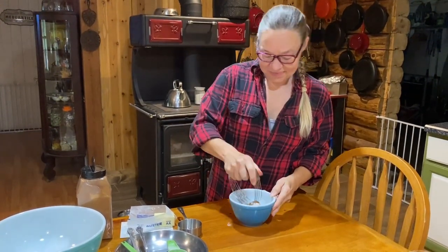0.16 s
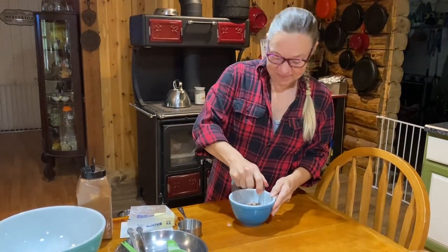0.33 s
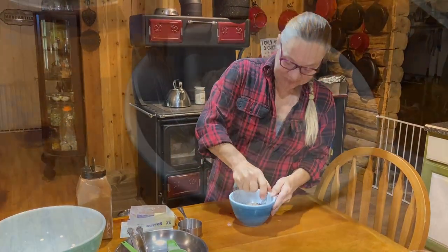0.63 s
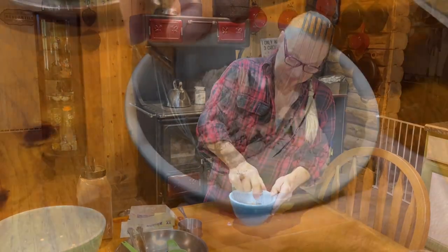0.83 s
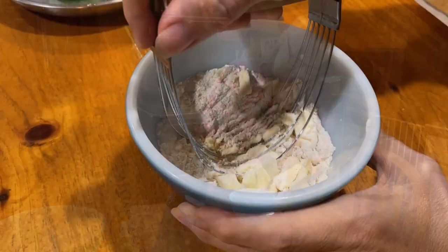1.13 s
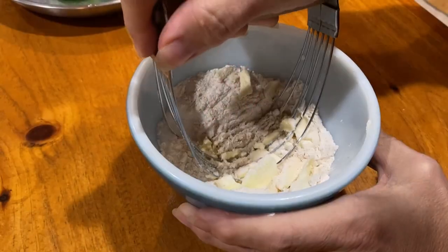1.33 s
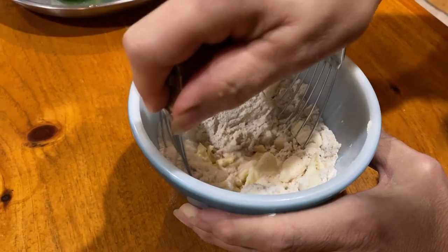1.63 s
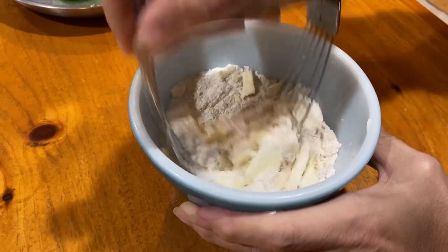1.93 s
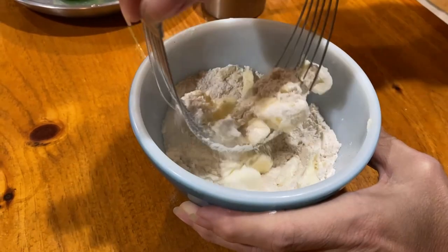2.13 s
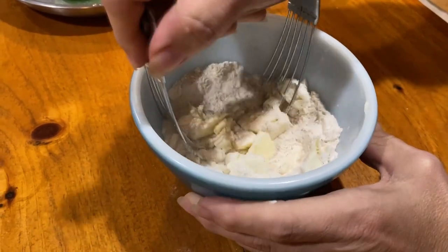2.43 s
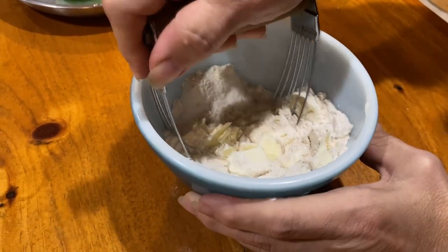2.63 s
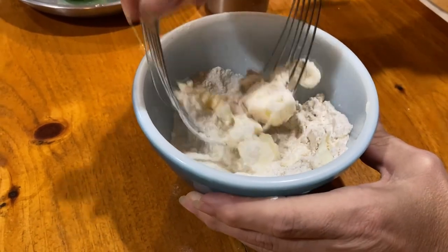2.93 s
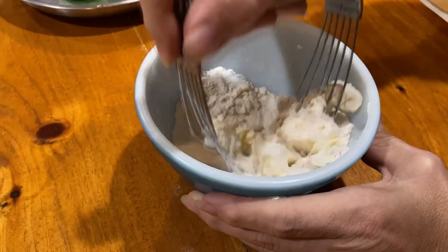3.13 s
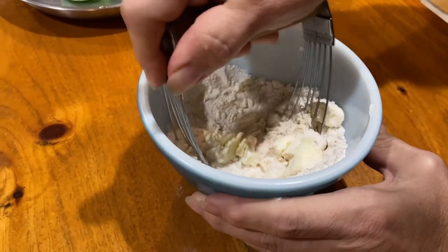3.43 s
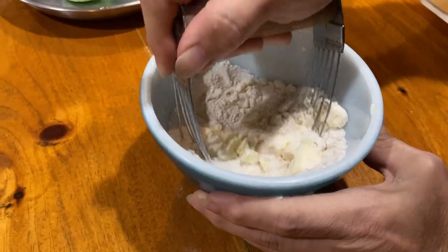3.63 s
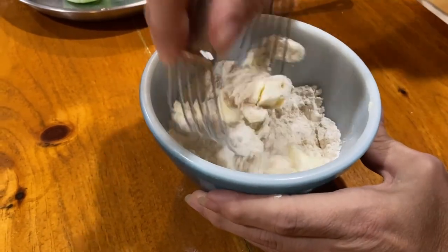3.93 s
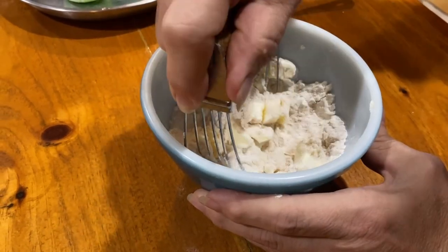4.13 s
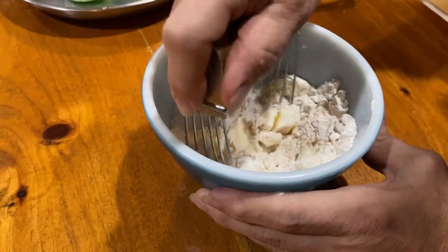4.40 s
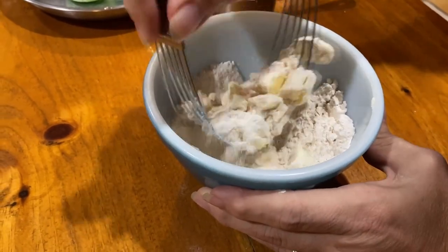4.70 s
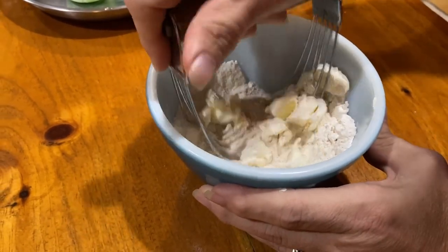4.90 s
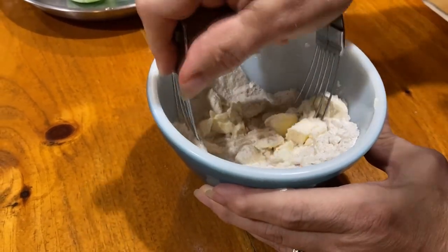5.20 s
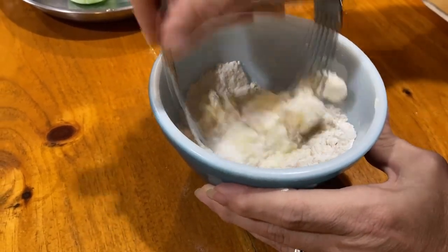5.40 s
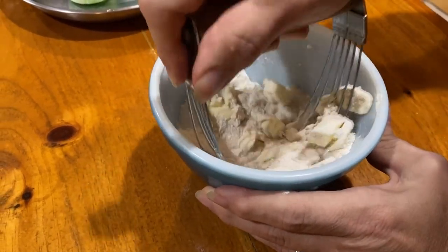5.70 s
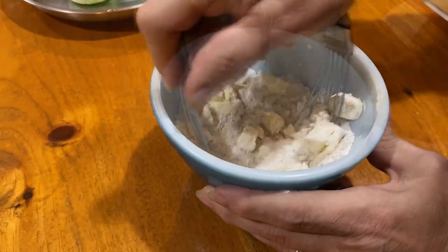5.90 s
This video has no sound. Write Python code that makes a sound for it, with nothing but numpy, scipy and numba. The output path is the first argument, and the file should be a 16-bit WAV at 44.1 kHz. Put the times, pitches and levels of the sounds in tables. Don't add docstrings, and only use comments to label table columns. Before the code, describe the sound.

Quiet kitchen air and a faint steady appliance hum fade in, heard across a wooden room. Small bowl bumps and a faint clink come at 0.1, 0.25 and 0.5-0.7 s, then a hard wooden set-down with a rattle at 0.9 s. From about 1 s the perspective is close: a thin wire pings, then a wire cutter pushes through butter and flour with dry rasp and gritty glass hiss near 1.65 s. Stronger chops at 2.15-2.6 s bring low table thumps, snaps and bowl clinks. A lighter lull follows, then a sharp snap at 3.5 s and a woody knock at 3.65 s. The loudest, brightest cracks and clinks land at 4.2-4.3 s with heavy thuds. Smaller strokes follow at 4.8-5.25 s, ending with a high wire ping, a scraping clink at 5.6 s and a last snap and scrape at 5.88 s. Short woody reflections surround everything.

```python
import sys
import numpy as np
from scipy import signal
from scipy.fft import rfft, irfft, next_fast_len
from scipy.io import wavfile
from scipy.ndimage import uniform_filter1d
from numba import njit

SR = 44100
rng = np.random.default_rng(int(sys.argv[2]) if len(sys.argv) > 2 else 0)


def how_loud(loudness_db):
    steps = np.asarray(loudness_db, float) / 20
    return 10 ** steps


def wrap_up_sound(samples):
    columns = np.atleast_2d(samples).T
    tamed = np.clip(columns, -1, 1)
    steps = np.round(tamed * 32767).astype(np.int16)
    wavfile.write(sys.argv[1], SR, steps)


N = 267025
SCENE_CHANGE_S = 1.02


def unit(x):
    return x / np.sqrt(np.mean(x ** 2))


def band(x, lo_hz, hi_hz, order=2):
    return signal.sosfilt(signal.butter(order, [lo_hz, hi_hz], "bandpass", fs=SR, output="sos"), x)


def resonate(x, hz, width_hz):
    return signal.lfilter(*signal.iirpeak(hz, hz / width_hz, SR), x)


def colour(x, points):
    hz, db = np.transpose(points)
    size = next_fast_len(x.shape[-1])
    f = np.maximum(np.fft.rfftfreq(size, 1 / SR), 1)
    gain = how_loud(np.interp(np.log(f), np.log(hz), db))
    return irfft(rfft(x, size) * gain, size)[..., :x.shape[-1]]


def curve(s, values):
    return np.interp(np.arange(N) / SR, s, values)


def walk(rate_hz):
    hold = int(SR / rate_hz)
    steps = np.repeat(rng.standard_normal(N // hold + 1), hold)
    return 1.42 * uniform_filter1d(uniform_filter1d(steps, hold), hold)[:N]


def ring(hz, db, t60_s, phase, length_s):
    t = np.arange(int(length_s * SR)) / SR
    tones = np.sin(2 * np.pi * hz[:, None] * t + phase[:, None])
    fades = 1000. ** (-t / t60_s[:, None])
    return (how_loud(db)[:, None] * tones * fades).sum(0)


def add(out, s, x):
    i = int(s * SR)
    out[i:i + len(x)] += x[:N - i]


def bursts(count, peak_ms):
    t = np.arange(int(.03 * SR)) / SR * 1000 / peak_ms
    return rng.standard_normal((count, len(t))) * t * np.exp(1 - t)


def grains(rate_hz, spread_db):
    sizes = rng.standard_normal(N) * how_loud(spread_db * rng.exponential(size=N))
    return (rng.random(N) < rate_hz / SR) * sizes


def strokes(s, rise_s, fall_s, db):
    rounding = 1.31
    late = np.arange(0, N, 64) / SR - s[:, None]
    share = np.abs(np.where(late < 0, late / rise_s[:, None], late / fall_s[:, None]))
    return how_loud(db[:, None] - 20 * share ** rounding)


def together(gains, rest_db):
    return curve(np.arange(0, N, 64) / SR, np.sqrt((gains ** 2).sum(0) + how_loud(2 * rest_db)))


@njit
def hollow(x, hz, sharp):
    y, b, l = np.empty(len(x)), 0., 0.
    for i in range(len(x)):
        g = np.tan(np.pi * hz[i] / SR)
        v = (b + g * (x[i] - l)) / (1 + g * (g + 1 / sharp))
        b, l, y[i] = 2 * v - b, l + 2 * g * v, v * (1000 / hz[i]) ** .25
    return y


# frequency in Hz, level in dB per Hz.
AIR_COLOUR = [(53, -40.5), (90, -10.5), (282, -24), (494, -9.5), (654, -14.5), (713, -1.5), (1050, -25),
              (5300, -24), (11500, -35), (15600, -56)]
# pitch in Hz, rms level in dB.
HUM_TONES = [(360.7, -77), (721, -75)]
# time in seconds, level in dB.
BACKGROUND_FADE = [(0, -28), (.45, -15), (.75, -2.5), (1.1, -2)]


def kitchen():
    shared = colour(rng.standard_normal(N), AIR_COLOUR)
    own = colour(rng.standard_normal((2, N)), AIR_COLOUR)
    air = unit(shared + 4.2 * band(own, 440, 16000)) * how_loud(-63 + 0.88 * walk(2.5))
    t = np.arange(N) / SR
    hum = np.zeros(N)
    for hz, db in HUM_TONES:
        hum += np.sqrt(2) * how_loud(db + 4.0 * walk(16.0)) * np.sin(2 * np.pi * hz * t)
    return (air + hum) * how_loud(curve(*np.transpose(BACKGROUND_FADE)))


# time in seconds, level in dB.
LEANING = [(0.0, -75), (0.59, -74), (1.04, -51), (1.3, -57.5), (2.14, -65), (2.46, -39.5), (2.93, -65.5),
           (3.49, -48), (4.0, -65.5), (4.36, -42), (4.53, -57.5), (5.09, -50), (5.41, -63.5), (6.05, -52)]


def rumble():
    return how_loud(curve(*np.transpose(LEANING))) * unit(resonate(rng.standard_normal(N), 65, 27.97))


# frequency in Hz, level in dB per Hz.
SLAM_COLOUR = [(240, -19), (400, 11.5), (455, -7), (684, -2.5), (819, -14.5), (2830, -24.5), (8500, -81),
               (11000, -84.5)]


def slam():
    out, t = np.zeros(N), np.arange(int(.4 * SR)) / SR
    body = unit(colour(rng.standard_normal(len(t)), SLAM_COLOUR))
    fade = 1000. ** (-t / 0.43) + 2.6 * 1000. ** (-t / 0.14)
    add(out, .893, how_loud(-28) * body * fade)
    return out


# mode in Hz, level in dB, t60 in seconds.
TABLE_MODES = [(72.1, -7.5, 0.42), (99.2, -16, 0.28), (124.3, 1.5, 0.23), (138.1, -8.5, 0.35),
               (152.15, -3.5, 0.26), (171.6, -6.5, 0.24), (203, -7, 0.24), (229.8, 3.5, 0.15),
               (269.6, 2, 0.18), (328.2, -2, 0.13), (389.6, -5, 0.15)]
# start in seconds, peak in dB, strongest table pitch in
# Hz.
BUMPS = [
    (0.122, -50, 171),
    (0.242, -45.5, 197),
    (0.508, -46.5, 152),
    (0.574, -43, 196),
    (0.71, -43, 184),
    (0.89, -6.5, 178),
    (1.138, -39, 152),
    (1.284, -51, 163),
]
# start in seconds, peak in dB, strongest table pitch in Hz.
PUSHES = [(1.644, -27.5, 110), (1.699, -33.5, 162), (2.172, -25.5, 109), (2.316, -21.5, 121),
          (2.38, -34, 159), (2.43, -30, 144), (2.509, -12, 142), (2.544, -16.5, 127), (2.718, -33, 144),
          (3.497, -17, 137.4), (3.533, -19, 134), (3.589, -30, 144), (3.96, -42.5, 102.6),
          (4.021, -35.5, 129), (4.093, -36.5, 153), (4.178, -23.5, 149), (4.194, -12.5, 122),
          (4.292, -6.5, 125.6), (4.359, -41, 144.6), (4.437, -32.5, 138), (4.483, -37.5, 146.6),
          (4.519, -37, 143), (5.016, -18, 122), (5.88, -24.5, 115), (5.931, -38.5, 132)]
# start in seconds, peak in dB, strongest pitch in Hz.
ROCKS = [(1.564, -35.5, 128), (1.822, -33.5, 198), (1.855, -31, 138.5), (2.267, -19.5, 124),
         (2.601, -18, 136), (2.624, -17.5, 128), (2.839, -42.5, 150), (3.136, -53, 200),
         (3.342, -44.5, 151), (3.647, -8, 141), (3.684, -19, 143), (4.249, -18.5, 126), (4.326, -8.5, 139),
         (4.757, -24, 123), (4.8, -28.5, 131), (5.112, -30, 122), (5.164, -33, 132), (5.252, -31.5, 130),
         (5.328, -44.5, 133), (5.6, -37.5, 167), (5.766, -42, 158), (5.848, -34, 124)]


def thumps():
    out, (hz, db, t60_s) = np.zeros(N), np.transpose(TABLE_MODES)
    t = np.arange(int(.35 * SR)) / SR
    softness = 1 - np.exp(-t / 0.0072)
    above_55_hz = signal.butter(2, 55, "highpass", fs=SR, output="sos")
    for rows, upper_db in ((BUMPS, -2.5), (PUSHES, -19.5), (ROCKS, -10.5)):
        for s, peak_db, main_hz in rows:
            chance = rng.standard_normal((3, len(hz)))
            near_db = np.where(hz > 210, upper_db, -14 * np.abs(np.log2(hz / main_hz)))
            mode_db = db + near_db + 2.17 * chance[1]
            wood = ring(hz * (1 + 0.0375 * chance[0]), mode_db, 0.8 * t60_s, 0.53 * chance[2], .35)
            wood = signal.sosfilt(above_55_hz, wood * softness)
            add(out, s, how_loud(peak_db - 1.0) * wood / np.abs(wood).max())
    return out


# peak time in seconds, rise and fall
# in seconds per 20 dB, peak in dB, pitch of the hollow in Hz.
FAR_CHOPS = [
    (0.126, -0.14, 0.57, -64.5, 2150),
    (.515, .02, .2, -62, 1410),
    (0.897, 0.022, 0.2146, -31.5, 720),
]
CHOPS = [(1.05, .07, 0.18, -43, 1960), (1.5, 0.48, .3, -51.5, 1037), (1.68, .22, .09, -33, 1400),
         (1.8, .1, 0.27, -56.5, 1112), (2.17, .02, 0.2, -45, 2050), (2.27, 0.084, 0.077, -36, 1220),
         (2.39, .15, 0.36, -42.5, 986), (2.508, 0.086, 0.17, -27, 1056), (3.15, 0.089, 0.067, -42.5, 2010),
         (3.36, .15, .15, -44, 1500), (3.49, .2, 0.28, -47, 800), (3.66, .4, 0.072, -47, 1026),
         (3.99, .05, .5, -45.5, 850), (4.2, 0.066, .2, -39.5, 1005), (4.29, 0.18, 0.12, -33.5, 1260),
         (4.51, .3, 0.06, -51.5, 1390), (4.79, 0.046, 0.16, -42, 930), (4.91, 0.17, 0.31, -41.5, 2140),
         (5.02, 0.09, 0.12, -38.5, 1225), (5.16, 0.056, .04, -37, 1070), (5.26, .015, 0.13, -43, 2170),
         (5.62, .11, .15, -45, 1500), (5.871, 0.35, 0.15, -45, 1062)]


def crumb_rasp():
    *chop, hollow_hz = np.transpose(FAR_CHOPS + CHOPS)
    chops = strokes(*chop)
    crumbs = band(grains(5000, 1.74), 230, 2200)
    power = chops ** 2
    centre_hz = (hollow_hz @ power + 1e-9) / (power.sum(0) + 1e-12)
    centre_hz = curve(np.linspace(0, N / SR, chops.shape[1]), centre_hz)
    rasp = unit(hollow(hollow(crumbs, centre_hz, 2.3), centre_hz, 1.6))
    rasp = rasp + 1.2 * unit(crumbs) + 0.35 * unit(resonate(crumbs, 1010, 90))
    return together(chops, -81) * how_loud(-5.0) * unit(rasp)


# frequency in Hz, level in dB per Hz.
GRIT_COLOUR = [(1350, -21), (2300, -3), (2740, -7), (3220, -10.5), (4290, 1.5), (5240, 1), (5770, -16.5),
               (7110, -3), (9260, -8.5), (12300, -19.5), (13900, -20.5), (15600, -34)]
# peak time in seconds, rise and fall in seconds per 20 dB,
# peak in dB, share of fine grit in dB.
SCRAPES = [(.125, 0.06, 0.35, -60, -17.5), (.84, 0.1, 1, -67, -19), (1.05, 0.01, 0.22, -52.5, -17),
           (1.3, 2, 6, -68.5, -15.5), (1.681, .2, 0.05, -37.5, -7), (2.171, -0.25, 0.25, -58.5, -3.5),
           (2.269, 0.07, .1, -40.5, -14), (2.52, 0.06, 0.03, -38, -14), (3.15, 0.2, 0.06, -49.5, -17),
           (3.349, 0.4, 0.05, -53, -15.5), (3.51, -0.26, 0.3, -51.5, -27), (3.99, .05, .5, -51, -22),
           (4.2, 0.1, .3, -49.5, -25.5), (4.29, 0.21, 0.08, -43, -9.5), (4.79, -0.13, 0.18, -58, -26),
           (4.95, 0.1, 0.41, -55, -34), (5.02, 0.2, -0.01, -56, 1), (5.15, 0.28, -0.03, -56.5, -1),
           (5.26, -0.04, 0.13, -42.5, -29), (5.618, 0.06, .1, -41.5, -8), (5.76, 0.14, -0.8, -55, -24),
           (5.88, 0.11, 0.01, -39.5, -9)]


def glass_scrape():
    *scrape, scrape_db, fine_db = np.transpose(SCRAPES)
    grit = colour(grains(6000, 2.27), GRIT_COLOUR)
    coarse = unit(band(grit, 1700, 9040)) * how_loud(3.75 * walk(12))
    fine = unit(band(grit, 7160, 14100, order=3))
    hiss = together(strokes(*scrape, scrape_db), -85.5) * how_loud(-5.5) * coarse
    hiss += together(strokes(*scrape, scrape_db + fine_db), -97.5) * how_loud(2.5) * fine

    s, *_, high_db, _ = np.transpose(CLINKS)
    slides = strokes(s, .005 + 0 * s, .2 + 0 * s, high_db - 20)
    singing = np.vstack([slides, strokes(*scrape, scrape_db - 29)])
    glass = np.zeros(N)
    for hz, db, t60_s in BOWL_MODES:
        if 2400 < hz < 6000:
            glass += how_loud(db + 6.63 * walk(60)) * unit(resonate(grit, hz, 3.2 / t60_s))
    return hiss + together(singing, -100) * glass


def drag():
    return how_loud(2.42 * walk(45)) * (crumb_rasp() + glass_scrape())


# start in seconds, pitch in Hz, level in dB, t60 in seconds.
PINGS = [
    (1.053, 1996, -39, .15),
    (5.262, 3554, -37.5, 0.12),
]


def pings():
    out = np.zeros(N)
    for s, *mode in PINGS:
        add(out, s, ring(*np.transpose([(*mode, 0)]), .2))
    return out


# start in seconds, snap peak, dull knock and sharp edge in dB.
SNAPS = [(0.5084, -47, -4, -22), (1.0256, -52, -8, -7), (1.0448, -38.5, -22, 1.5),
         (1.053, -27.5, -11.5, -9.5), (1.6452, -32, -8, -4.5), (1.6964, -32, -2, -6),
         (1.7574, -46, -11, -9), (2.164, -26, -19, -3.5), (2.5621, -24.5, -12.5, -25),
         (2.7442, -44.5, -1, -12.5), (3.3742, -39, -5, -39.5), (3.4971, -12, -20, -14),
         (4.089, -36, -7, -19), (4.1917, -4.5, -7, -24.5), (4.2894, -15, -7, -13), (4.5142, -39, -9, -22.5),
         (5.0724, -47, -6, 1), (5.0978, -40.5, -6, -3.5), (5.1094, -42, 1.5, -5), (5.2486, -21.5, -20, -20),
         (5.8786, -24.5, -7, -8.5)]
# start in seconds, snap peak, dull knock, edge in dB.
KNOCKS = [(0.575, -52, 2, -30), (0.8919, -18.5, 3.5, -31.5), (1.6643, -39, 4, 0.5),
          (1.8528, -55.5, 11.5, -15), (2.2748, -42, 12, -5), (2.468, -42.5, 12, -4),
          (2.4956, -24, 2.5, -10), (2.5196, -27, 5.5, -2), (2.8424, -49, 6.5, -29),
          (3.6474, -36.5, 10, -32), (4.4801, -46, 8.5, -19), (4.596, -57.5, 10, -12.5),
          (5.0013, -44.5, 6, -9), (5.0127, -26.5, 8, 0.5), (5.1522, -39, 3, -1), (5.162, -40, 3, -6)]


def ticks():
    out, crack = np.zeros(N), bursts(len(SNAPS + KNOCKS), 0.97)
    knock = band(crack, 500, 1500, order=4)
    snap = band(crack, 1500, 4000, order=4)
    edge = band(crack, 4000, 8400, order=4)
    tick = band(crack, 10200, 14500, order=4)
    for k, (s, peak_db, knock_db, edge_db) in enumerate(SNAPS + KNOCKS):
        tick_db = -12 + 1.15 * edge_db
        hit = 1.17 * snap[k] + 5.1 * how_loud(knock_db) * knock[k]
        hit += 2.65 * how_loud(edge_db) * edge[k] + 3.3 * how_loud(tick_db) * tick[k]
        add(out, s - .0008, how_loud(peak_db) * hit)
    return out


# mode in Hz, level in dB, t60 in seconds.
BOWL_MODES = [(997, 0, .07), (1120, -3, .08), (2688, -1, .075), (2778, -2, .15), (5035, 0, .16),
              (5150, -1, .11), (5265, -6, .07), (7965, -6, .06)]
# start in seconds, then the levels in dB of the 2.7 kHz pair,
# the 1 kHz pair, the 5 kHz group and the 8 kHz mode.
CLINKS = [(0.1188, -40.5, -64, -41.5, -49.5), (0.793, -66.5, -76, -53, -53.5), (0.835, -79, -67, -68, -80),
          (2.1619, -33, -44.5, -22.5, -45), (2.271, -42.5, -32.5, -64, -28.5),
          (2.4928, -45, -19, -42.5, -55), (2.5157, -36, -14.5, -59, -35), (2.5603, -37, -22, -62, -70.5),
          (2.7437, -66, -51, -77, -47), (3.4988, -22.5, -29.5, -36, -50.5), (4.0917, -41, -44, -58, -74),
          (4.1933, -22.5, -11, -25.5, -49), (4.2887, -20.5, -15, -33, -24), (4.4516, -44, -43, -42, -72),
          (4.5138, -42.5, -66, -41, -79), (4.7721, -63.5, -63, -56, -40.5),
          (5.0125, -39.5, -23.5, -68, -81.5), (5.2482, -43, -34.5, -35, -38),
          (5.2714, -45.5, -55.5, -42.5, -49), (5.611, -26, -43.5, -36, -39)]


def clinks():
    out, (hz, db, t60_s) = np.zeros(N), np.transpose(BOWL_MODES)
    for (s, mid_db, low_db, high_db, top_db), skid in zip(CLINKS, bursts(len(CLINKS), 1.46)):
        detune, damping = rng.standard_normal((2, len(hz)))
        family_db = np.select([hz < 1500, hz < 4000, hz < 6500], [low_db, mid_db, high_db], top_db)
        mode_db = db + family_db - 1.5 - 1.2 * (hz < 1500)
        glass = ring(hz * (1 + .003 * detune), mode_db, t60_s * how_loud(0.48 * damping), 0 * hz, 0.23)
        add(out, s - .0015, signal.fftconvolve(glass, skid / np.sqrt(np.sum(skid ** 2))))
    return out


def room(x):
    t = np.arange(int(.7 * SR)) / SR
    noise = rng.standard_normal((2, len(t))) * (t > .003)
    tail = 0.5 * band(noise[0], 124, 336) + 0.9 * band(noise, 451, 1250, order=3)
    tail = tail + 0.59 * band(noise, 1310, 7940) * 1000. ** (-t / 0.82)
    tail *= 1000. ** (-t / 0.31)
    return signal.fftconvolve(x[None], tail / np.sqrt(np.mean((tail ** 2).sum(1))), axes=1)[:, :N]


# frequency in Hz, left lead in radians, left minus right in dB.
CHANNEL_SHADING = [(30, -.8, 0), (100, -.55, 0), (260, -.6, 0), (450, -.95, .6), (1030, -.8, 1.5),
                   (2000, -.8, 4), (2670, -1.05, 2), (4200, -1.4, 2), (5100, -3.8, .5), (6400, -6.1, 2),
                   (7100, -5.2, 6), (8600, -3.4, .6), (11600, -.5, .1), (14200, 1.9, -.5)]


def two_channels(x):
    hz, lead, db = np.transpose(CHANNEL_SHADING)
    size = next_fast_len(N)
    f, side = np.fft.rfftfreq(size, 1 / SR), np.array([[.5], [-.5]])
    shading = how_loud(side * np.interp(f, hz, db))
    turn = np.exp(1j * side * np.interp(f, hz, lead))
    near = irfft(rfft(x, size) * shading * turn, size)[:, :N]
    return np.where(np.arange(N) < SCENE_CHANGE_S * SR, near[::-1], near)


def scene():
    bowl = rumble() + slam() + thumps() + drag() + pings() + ticks() + clinks()
    room_db = np.where(np.arange(N) < SCENE_CHANGE_S * SR, -7.5, -11)
    return two_channels(bowl + room(bowl * how_loud(room_db)) + kitchen())


def top_cut(x):
    return signal.sosfilt(signal.butter(12, 15720, fs=SR, output="sos"), x)


def record(dry):
    dipped = signal.lfilter(*signal.iirnotch(9300, 5.0, SR), dry)
    mix = np.clip(dipped, -.98, .98)
    return top_cut(mix)


dry = scene()
out = record(dry)
wrap_up_sound(out)
```